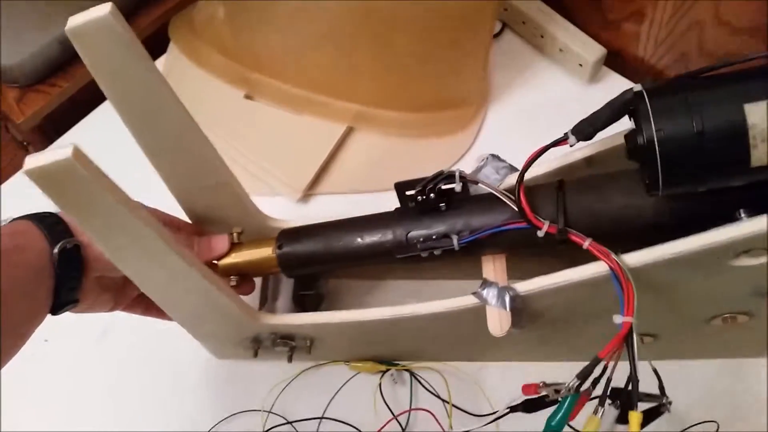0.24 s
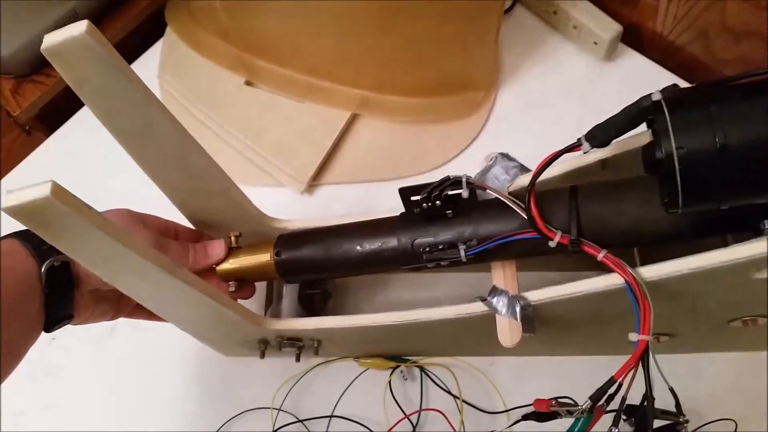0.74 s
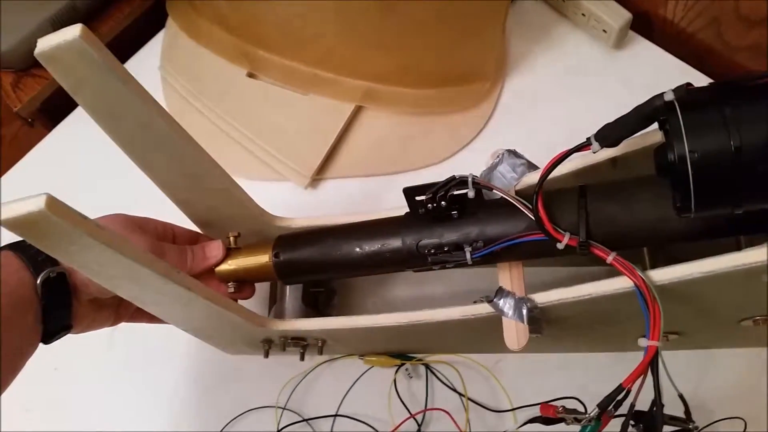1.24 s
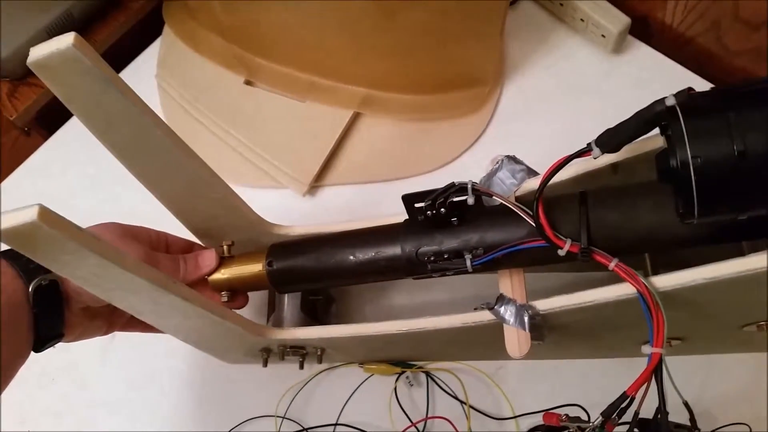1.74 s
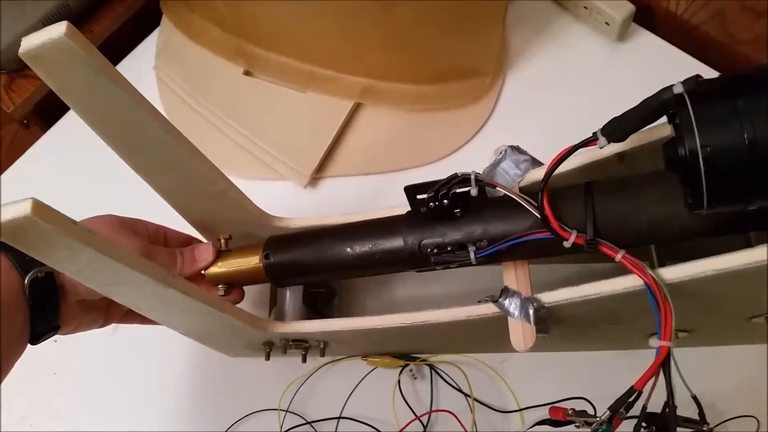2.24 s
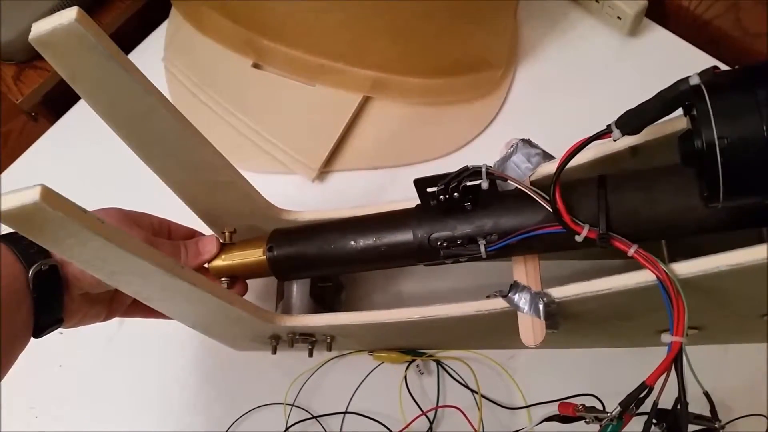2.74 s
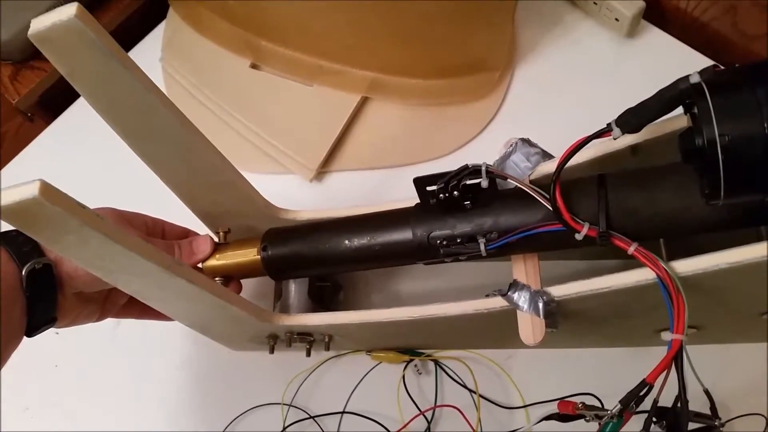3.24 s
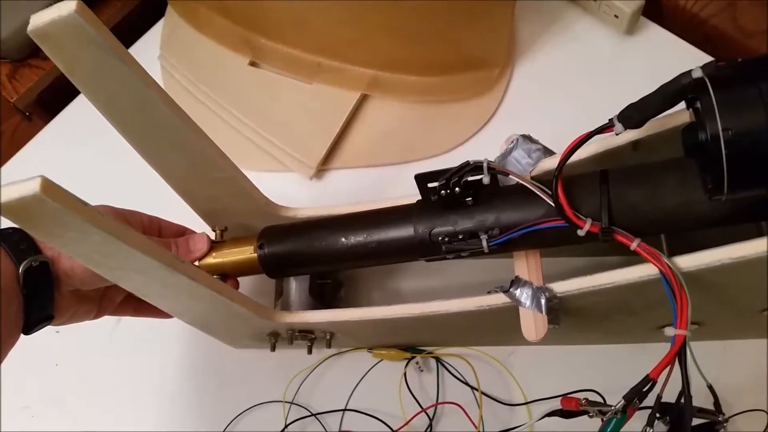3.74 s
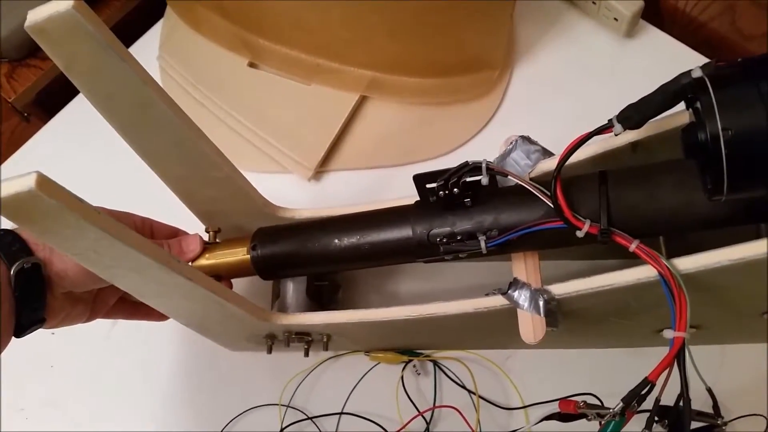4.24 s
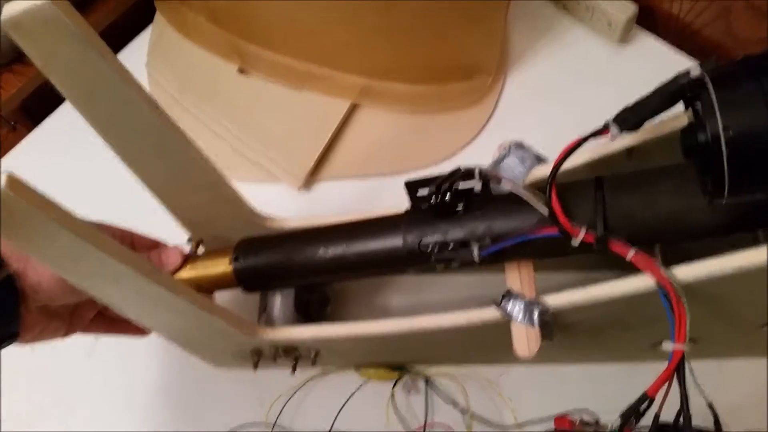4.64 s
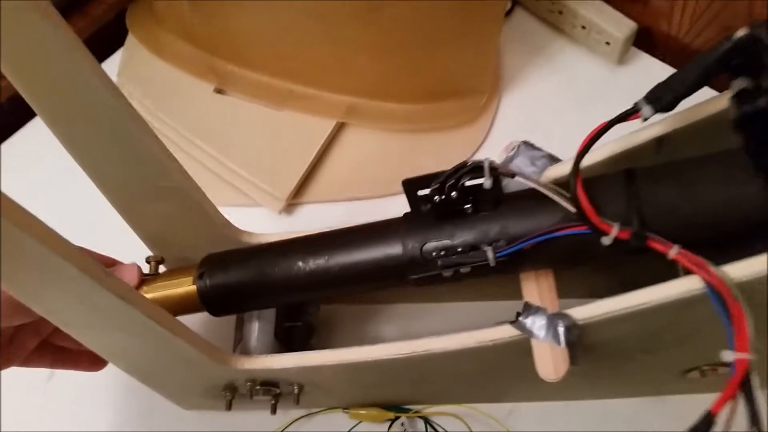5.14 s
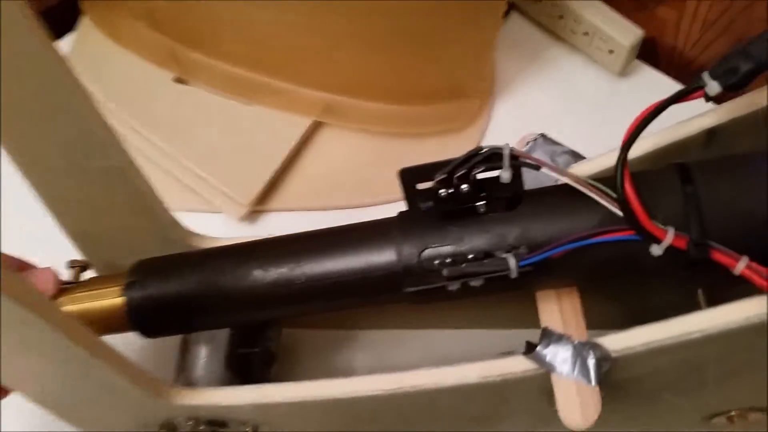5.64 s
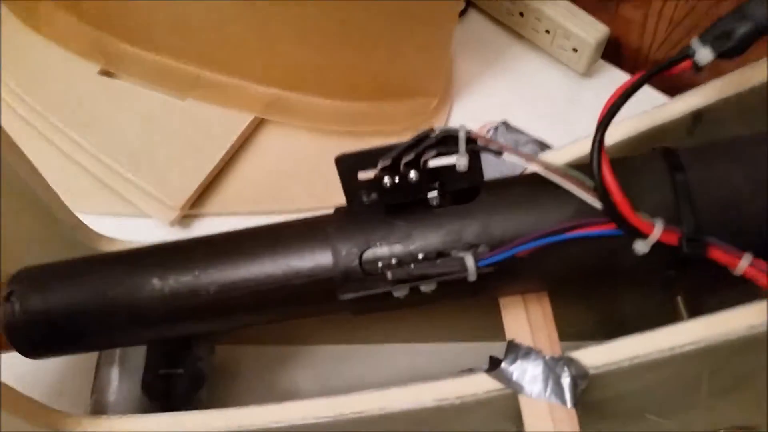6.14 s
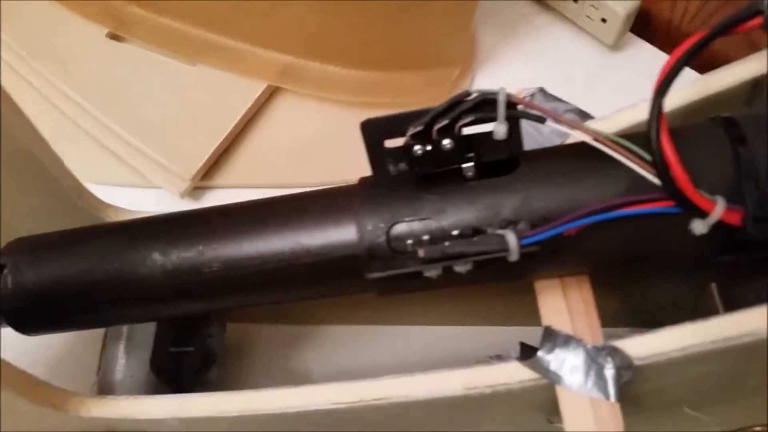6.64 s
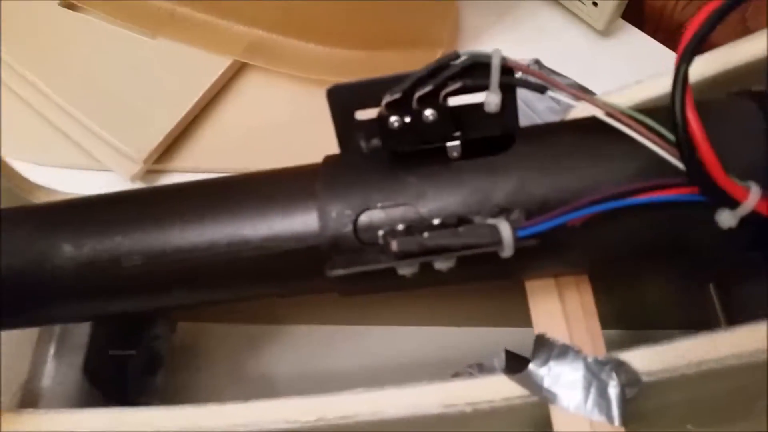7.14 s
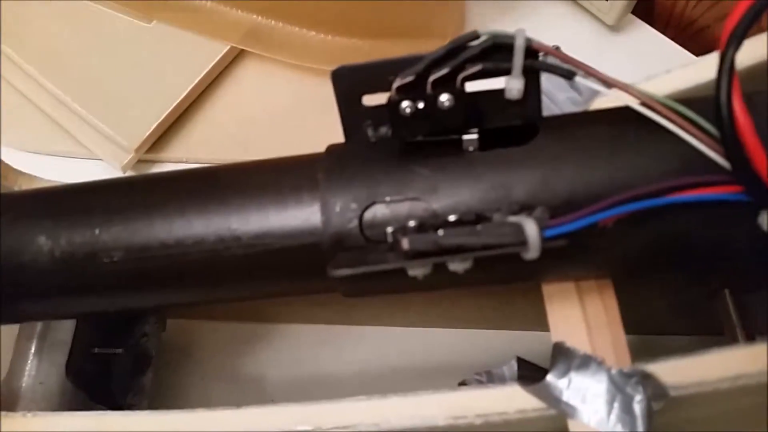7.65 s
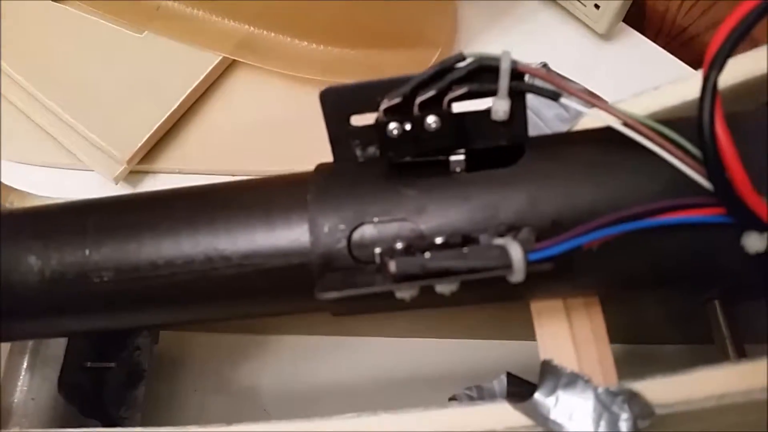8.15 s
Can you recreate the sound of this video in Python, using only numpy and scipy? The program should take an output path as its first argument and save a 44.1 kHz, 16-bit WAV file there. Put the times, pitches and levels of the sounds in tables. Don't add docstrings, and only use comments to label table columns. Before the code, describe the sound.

A small geared motor whines steadily with a rough, throbbing clatter, then brakes abruptly, leaving a quiet hissy room and one faint tick.

```python
import sys
import numpy as np
from scipy import signal
from scipy.fft import rfft, irfft, next_fast_len
from scipy.io import wavfile
from scipy.ndimage import uniform_filter1d

SR = 44100
rng = np.random.default_rng(int(sys.argv[2]) if len(sys.argv) > 2 else 0)


def file_out(sig):
    cols = np.atleast_2d(sig).T
    lim = np.clip(cols, -1, 1)
    pcm = np.round(lim * 32767).astype(np.int16)
    wavfile.write(sys.argv[1], SR, pcm)


def gain_from_decibels(decibels):
    exponent = np.asarray(decibels, float) / 20
    return 10 ** exponent


N = 369558
T = np.arange(N) / SR
SIZE = next_fast_len(N + SR)
HZ = np.maximum(np.arange(SIZE // 2 + 1) * SR / SIZE, 1)
PINION_TEETH, WHEEL_TEETH = 10, 85

# (time [s], share of full speed [0-1], free first tone [dB])
BRAKE = [
    (7.392, 1.0, -6),
    (7.402, .76, -12),
    (7.414, .64, -5),
    (7.438, .46, 1),
    (7.46, .3, -3),
    (7.5, .05, -22),
]


def columns(table, at):
    first, *rest = np.transpose(table)
    return [np.interp(at, first, c) for c in rest]


def swing(level_db):
    return gain_from_decibels(level_db - np.mean(level_db[T < BRAKE[0][0]]))


def walk(rate_hz):
    k = int(SR / rate_hz)
    steps = np.repeat(rng.standard_normal(N // k + 1), k)
    return 1.365 * uniform_filter1d(uniform_filter1d(steps, k), k)[:N]


def colour(x, gain):
    return irfft(rfft(x, SIZE) * gain, SIZE)[..., :N]


def density(table):
    rows = np.array(table, float)
    rows[:, 0] = np.log(rows[:, 0])
    return gain_from_decibels(np.array(columns(rows, np.log(HZ)))) * np.sqrt(SR / 2)


def pair(x, alike_hz, least):
    least = np.clip(least, 0, 1)
    alike = least + (1 - least) / (1 + (HZ / alike_hz) ** 2)
    return np.sqrt(alike) * rfft(x[0], SIZE) + np.sqrt(1 - alike) * rfft(x[1:], SIZE)


def humps(table):
    return [(1 / (1 + (2 * (HZ - hz) / width_hz) ** 2) ** 1.73, np.array([[left_db], [right_db]]))
            for hz, width_hz, left_db, right_db in table]


def bumps(rows):
    return sum(db * np.exp(-(2 * (T - s) / length_s) ** 2) for s, length_s, db in rows)


def nearness():
    # (time [s], nearness [0-1])
    approach = [
        (4.9, 0.14),
        (5.3, 1),
        (5.7, 1.0),
        (6.9, 1),
        (7.2, 1),
    ]
    return columns(approach, T)[0]


def wheel(part, turn):
    unevenness = {"tone 1": [(1, 5.5, 0.79), (2, 1.6, .0)], "tone 2": [(1, 4, 1.03), (3, 1.2, .28),
                  (4, 0.5, .03)], "tone 3": [(1, -0.4, 0.6), (2, 2.2, 0.27), (3, 1.4, .27)],
                  "high tones": [(1, 3.5, 0.53), (2, .5, 0.5)], "hurry 1": [(2, 2.0, 0.7), (3, 3.5, 0.08),
                  (4, 4.5, 0)], "hurry": [(1, 10, .19), (2, 3.5, .3), (4, 2.5, .08)],
                  "bright": [(1, 1.0, 0.89), (2, 1.7, 0.4)], "scrape": [(1, -1.2, 1), (2, 1.4, 0.22),
                  (3, 1, .0), (4, 1.5, 0)], "top": [(1, 2.5, .82), (2, 1.0, .31), (4, 1.3, .24)]}
    return sum(size * np.cos(2 * np.pi * round(waves) * (turn - crest))
               for waves, size, crest in unevenness[part])


def follow(part):
    # (time [s], scrape level [dB])
    load = [(0, -26), (.7, -25.5), (1.5, -25.0), (1.75, -26), (2.4, -27.0), (3.85, -26.5), (4.15, -25.5),
            (5.1, -25), (5.95, -25), (6.15, -27), (6.8, -26.5), (7.1, -26), (7.4, -24.5)]
    follows = {"tone 1": (0.8, 2, 2.04, -2), "tone 2": (0.74, 0.32, 1.55, 0.17),
               "tone 3": (.6, 0.53, 1.55, 0), "high tones": (0.89, 0.28, 1.7, 0), "third": (3, 3, 0.4, -4),
               "rattle": (1.2, 3.2, 0.5, -2), "middle": (0.97, 0.28, 1.5, 0), "bright": (1, 0.6, 8, -5.5),
               "scrape": (1.01, .1, 1.5, 0), "sideband": (0, 0, 0, 0)}
    spots = {"tone 1": [(5.35, 0.44, -3.5), (5.8, .4, 1), (6.4, 0.53, -2.5), (7.25, 0.98, 3)],
             "tone 2": [(5.08, 0.41, 4.5), (5.55, 0.23, -2.5), (6.3, 0.99, 3), (7.2, 0.7, -2)],
             "tone 3": [(5.4, .25, -4), (5.95, .15, 5), (6.25, 0.39, -7), (7.2, .3, 4)],
             "high tones": [(.4, .8, 3.5)], "sideband": [(5.85, 0.53, -14)], "third": [(.15, 0.55, 2.5),
             (3.3, 0.18, 5), (5.3, 0.14, 4)], "rattle": [(.08, .3, 7)], "bright": [(5.45, 0.54, -1.5)]}
    screw_hz = 1.439
    share, screw_db, crest_s, near_db = follows[part]
    screw = np.cos(2 * np.pi * screw_hz * (T - crest_s))
    level_db = share * columns(load, T)[0] + screw_db * screw + near_db * nearness()
    return swing(level_db + bumps(spots.get(part, [])))


def floor():
    # (frequency [Hz], left [dB per Hz], right [dB per Hz])
    hiss = [(25, -74, -87.5), (60, -83.5, -82.5), (110, -80, -86), (200, -97.5, -90), (500, -93, -100.1),
            (900, -95.5, -103.7), (1300, -86.5, -105.4), (1750, -90.5, -106.9), (2500, -104.9, -113.4),
            (3200, -97, -112.7), (4200, -81, -112.6), (5200, -102.7, -121.9), (7000, -128.6, -130.3),
            (15500, -121.1, -122.1)]
    # (time [s], length [s], rumble rise [dB])
    hand = [(.3, 1.6, 8.5), (1.4, .6, 2.5), (2.8, .3, 4), (4.3, .4, 5), (5.0, .6, 17), (5.45, 0.34, 13),
            (5.75, .4, 15), (6.6, .3, 15), (7.2, .4, 5.5), (7.65, 0.53, 13.5), (8.1, .6, 8)]
    # (time [s], peak level [dB])
    tick = [(8.347, -55)]
    rest_db = -8
    noise = rng.standard_normal((3, N))
    lumps = gain_from_decibels(rest_db + bumps(hand) + 2.0 * walk(18))
    bass = 1 / (1 + (HZ / 150) ** 4)
    rumble = np.sqrt(bass) * pair(noise * lumps, 14, .05)
    ports = rumble + np.sqrt(1 - bass) * rfft(rng.standard_normal((2, N)), SIZE)
    out = irfft(ports * density(hiss), SIZE)[:, :N]
    for s, db in tick:
        age_s = np.maximum(T - s, 0)
        ping = (T > s) * np.exp(-age_s / 0.0018) * np.sin(2 * np.pi * 1500 * age_s)
        out = out + gain_from_decibels(db) * ping * np.array([[1.5], [.4]])
    return out


def room(x):
    # (frequency [Hz], decay time T60 [s])
    decay = [(400, 0.48), (900, 0.55), (2600, 0.3), (9000, 0.25), (14000, 0.28)]
    tail_db = -15
    t, tail = T[:SR // 2], 0
    grains = rng.standard_normal((3, SR // 2))
    centres = np.log([hz for hz, _ in decay])
    for k, (_, t60_s) in enumerate(decay):
        fade = np.exp(-np.log(1000) * t / t60_s) * np.clip((t - .003) / 0.011, 0, 1)
        share = np.interp(np.log(HZ), centres, np.eye(len(centres))[k])
        tail = tail + share * pair(grains * fade / np.sqrt(np.sum(fade ** 2)), 570, 0.033)
    return colour(x, 1 + gain_from_decibels(tail_db) * tail)


def clatter(teeth, speed):
    # (frequency [Hz], left [dB per Hz], right [dB per Hz])
    base = [(30, -77.5, -90), (60, -70, -67.5), (175.8, -72.5, -73.5), (347, -61, -63.5), (636, -72, -73),
            (930, -64.5, -73.5), (2080, -69.5, -67.5), (3120, -64.5, -66.5), (4600, -70.5, -83),
            (7130, -68, -87), (8750, -67.5, -68.5), (11800, -84.5, -65), (14000, -76.5, -67),
            (15550, -77, -60.5)]
    # (frequency [Hz], width [Hz], left [dB], right [dB])
    housing = [(116, 25, 8, 4), (258, 35, 8.5, 11), (294.7, 16, 6.5, 9), (444.5, 21, 10.5, 5),
               (803, 126, 14, -1.5), (1180, 100, 15.5, 16), (1348, 150, 5.5, 11), (1661, 180, 14, 16.5),
               (1839, 62, 6, 13), (2447, 206, -10, 10), (10440, 730, 4, 10.5), (11100, 920, 12, 11),
               (12800, 550, 3, 4)]
    # (frequency [Hz], width [Hz], left [dB], right [dB])
    near_change = [(8180, 1700, 5.5, 5), (10240, 960, 3.5, 5), (11200, 580, 2, -4), (12100, 500, 6, -4.5),
                   (15400, 550, 2, 3.5), (6560, 520, -1, 18)]
    # (place [turn 0-2], level [dB])
    knocks = [
        (1.82, 3.3),
        (1.931, 4.7),
    ]
    knock_turns = 0.019
    turn = teeth / WHEEL_TEETH
    bright_db, scrape_db, top_db = (wheel(part, turn) for part in ("bright", "scrape", "top"))
    bright_db = bright_db + sum(db * np.exp(-((turn % 2 - place) / knock_turns) ** 2) for place, db in knocks)
    blow = rng.standard_normal(N // 40)[teeth.astype(int)]
    bursts = 1 + 0.32 * np.cos(2 * np.pi * teeth) + 0.15 * np.cos(2 * np.pi * teeth / PINION_TEETH)
    rattle, middle, bright, scrape = map(follow, ("rattle", "middle", "bright", "scrape"))
    layers = [rattle * gain_from_decibels(1.6 * walk(9) + 32 * speed * (1 - speed)) * speed ** 0.56,
              middle * gain_from_decibels(0.77 * walk(20) + 1.6 * blow) * speed ** 2.0,
              bright * gain_from_decibels(1.2 * bright_db + 0.87 * walk(22) + 1.68 * blow) * speed ** 2.7,
              scrape * gain_from_decibels(0.96 * scrape_db + .8 * walk(25) + 1.1 * blow) * bursts * speed ** 6.4,
              scrape * gain_from_decibels(1.25 * top_db + 1.1 * walk(25) + 1.3 * blow) * bursts * speed ** 5.5]
    above = [1] + [1 / (1 + (hz / HZ) ** 8) for hz in (600, 3600, 9000, 12000)] + [0]
    ports = 0
    for k, gate in enumerate(layers):
        band = np.sqrt(np.abs(above[k] - above[k + 1]))
        ports = ports + band * pair(gate * rng.standard_normal((3, N)), 1500, .5)
    ports = ports * density(base) * np.sqrt(1 + sum(gain_from_decibels(db) ** 2 * shape for shape, db in humps(housing)))
    near_gain = gain_from_decibels(sum(db * shape for shape, db in humps(near_change)))
    far, close = (irfft(ports * gain, SIZE)[:, :N] for gain in (1, near_gain))
    return far + nearness() * (close - far)


def tone(multiple, turns, left_db, right_db, gain, drift_rad, rate_hz=25):
    phase = 2 * np.pi * multiple * turns + drift_rad * walk(rate_hz)
    apart = drift_rad * 0.85 * walk(rate_hz / 2)
    level = np.sqrt(2) * gain * gain_from_decibels(np.array([[left_db], [right_db]]))
    return level * np.sin(phase + np.array([apart, -apart]))


def shaft(teeth, speed):
    # (time [s], level [dB])
    bench = [(0, -39.5), (.7, -34.5), (1.3, -36.5), (2.0, -42), (2.6, -44.5), (3.0, -36.5), (3.6, -38.5),
             (4.4, -36), (5.1, -38.5), (5.8, -39.5), (6.4, -46.5), (7.0, -41), (7.4, -38)]
    # (multiple of shaft rate, left [dB], right [dB])
    lines = [(1, -40.5, -36.5), (2.004, -58, -53.5), (3, -40.5, -40), (4.976, -42.5, -47.5),
             (8.995, -37.5, -58), (11, -51.5, -53.5), (11.7, -51.5, -51), (16.82, -46.5, -46),
             (19.17, -40.5, -41), (21.88, -65, -42.5), (24.8, -59.5, -42)]
    rock_hz, rock_crest_s, rock_far, rock_near = 2.2, 6.5, .2, .55
    near = nearness()
    runout = gain_from_decibels(-4.0 * near)
    rock_share = rock_far + (rock_near - rock_far) * near
    rock = 1 + rock_share * np.exp(2j * np.pi * rock_hz * (T - rock_crest_s))
    hum = swing(columns(bench, T)[0]) * np.abs(rock)
    third = follow("third") * gain_from_decibels(1.5 + .8 * walk(6))
    out = 0
    for multiple, left_db, right_db in lines:
        unrest = .15 if multiple == 1 else 1
        gain = {1: hum, 3: third}.get(multiple, runout) * gain_from_decibels(unrest * 3.5 * walk(14))
        drift_rad = unrest * (0.25 + 0.039 * multiple)
        out = out + tone(round(multiple), teeth / PINION_TEETH, left_db, right_db, gain * speed ** 1.6, drift_rad)
    return out


def mesh(teeth, speed):
    # (multiple of shaft rate, left [dB], right [dB])
    harmonics = [(10.02, -33, -35), (19.96, -29.5, -24), (30.1, -36, -44.5), (39.98, -38.5, -47),
                 (49.6, -39.5, -51), (60.86, -44.5, -50), (69.46, -42, -51), (77.95, -44, -44.5),
                 (91.6, -57.5, -49)]
    ring_hz, ring_width_hz = 834, 19
    sideband_db, sideband_turn = -3, .52
    near, turn, out = nearness(), teeth / WHEEL_TEETH, 0
    first = np.cumsum(wheel("hurry 1", turn + 0.18) * speed) / SR
    rest = np.cumsum(wheel("hurry", turn) * speed) / SR
    swell = [follow("tone 1") * gain_from_decibels(3.4) * (1 + .1 * (1 - .8 * near) * wheel("tone 1", turn + .08)),
             follow("tone 2") * gain_from_decibels(1.35 * (1 - .85 * near) * wheel("tone 2", turn)),
             follow("tone 3") * gain_from_decibels(1.4 * wheel("tone 3", turn)),
             follow("high tones") * gain_from_decibels(1.1 * wheel("high tones", turn))]
    for k, (_, left_db, right_db) in enumerate(harmonics):
        lead = (1.4 if k < 2 else .8) * rest if k else .9 * first
        gain = swell[min(k, 3)] * gain_from_decibels(min(.5 + .3 * k ** 2, 2.2) * walk(60 + 10 * k))
        drift_rad = min(.08 + .14 * k ** 2, 1.1)
        sound = tone((k + 1) * PINION_TEETH, (teeth + lead) / PINION_TEETH, left_db, right_db,
                     gain * speed ** (3.5 * k), drift_rad, 25 + 7 * k ** 2)
        if k == 0:
            beat = teeth + lead + turn - sideband_turn
            beat_gain = gain * near * follow("sideband") * gain_from_decibels(sideband_db)
            sound = sound + tone(1, beat, left_db, right_db, beat_gain, .1)
            ring = colour(sound, 1 / (1 + 2j * (HZ - ring_hz) / ring_width_hz))
            free_db = -9 + columns(BRAKE, T)[1] + (3.5 + 5 * (1 - speed)) * walk(150)
            sound = gain_from_decibels(2.5) * ring + gain_from_decibels(free_db) * sound
        out = out + sound
    return out


def scene():
    # (frequency [Hz], phase of left against right [rad])
    left_phase = [(0, 0), (250, .25), (800, -.85), (1170, -2.8), (1677, -5.5), (2500, -6.7), (16000, -43)]
    mesh_hz, mesh_gain_hz_per_s = 832.9, .25
    speed = columns(BRAKE, T)[0] * (T < BRAKE[-1][0])
    teeth = np.cumsum(speed * (mesh_hz + mesh_gain_hz_per_s * T)) / SR
    machine = mesh(teeth, speed) + shaft(teeth, speed) + clatter(teeth, speed)
    machine = colour(machine, np.exp(1j * np.array([columns(left_phase, HZ)[0], 0 * HZ])))
    return room(machine) + floor()


def roll_off(x):
    return signal.sosfilt(signal.butter(12, 16580, fs=SR, output="sos"), x)


def record(dry):
    top_hz, slope_hz = 15770, 25
    top = (1 - np.tanh((HZ - top_hz) / slope_hz)) / 2
    mix = colour(dry, top)
    return roll_off(mix)


dry = scene()
out = record(dry)
file_out(out)
```